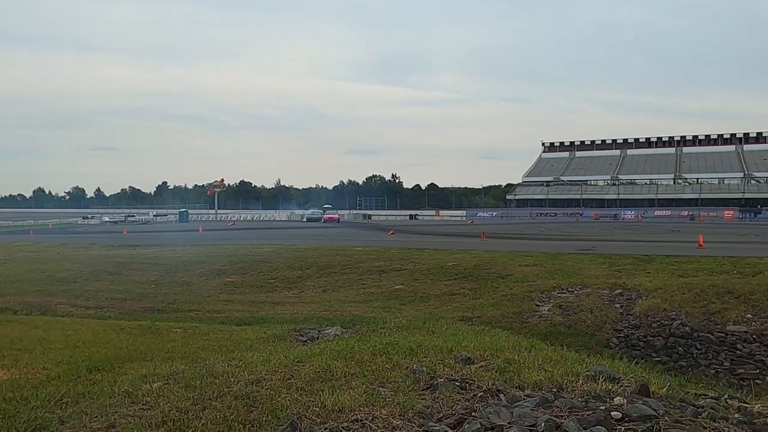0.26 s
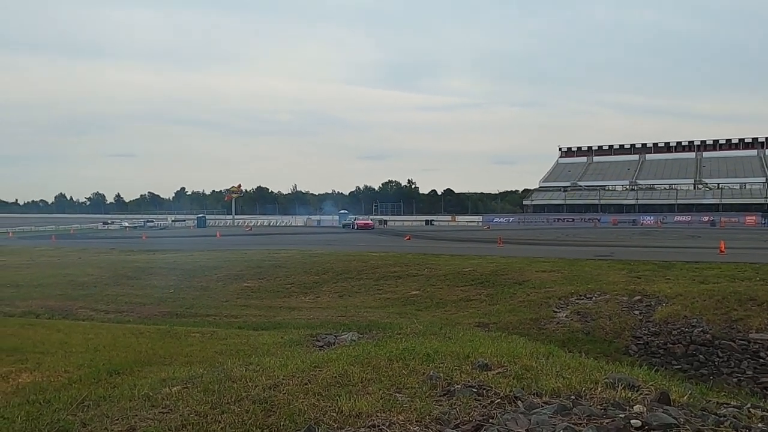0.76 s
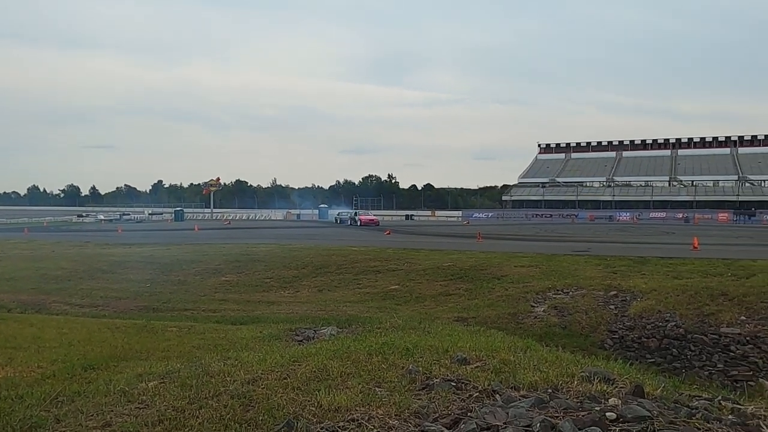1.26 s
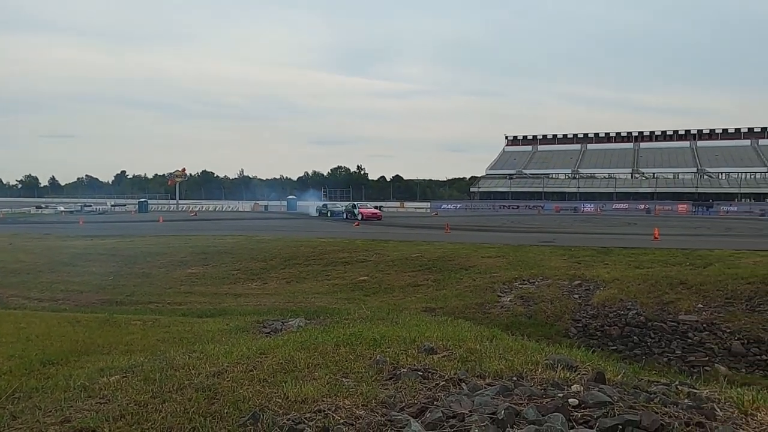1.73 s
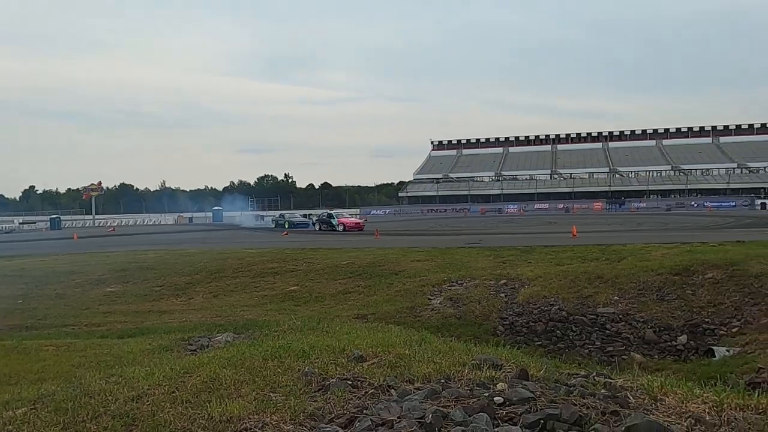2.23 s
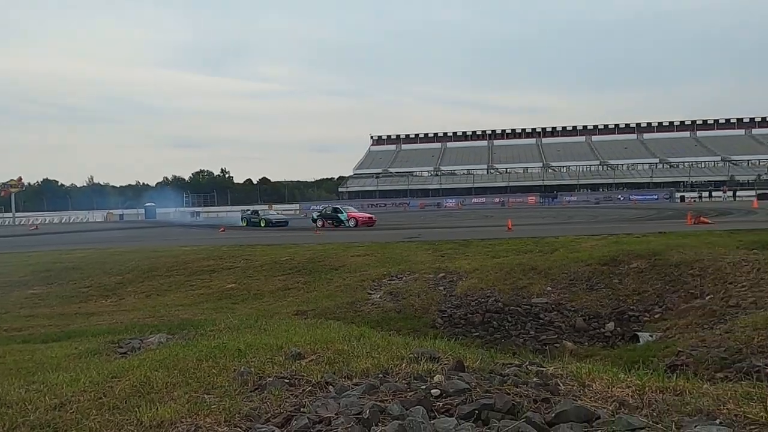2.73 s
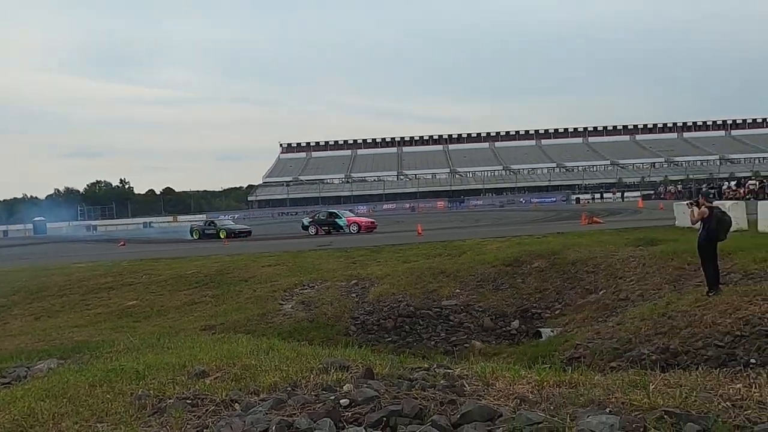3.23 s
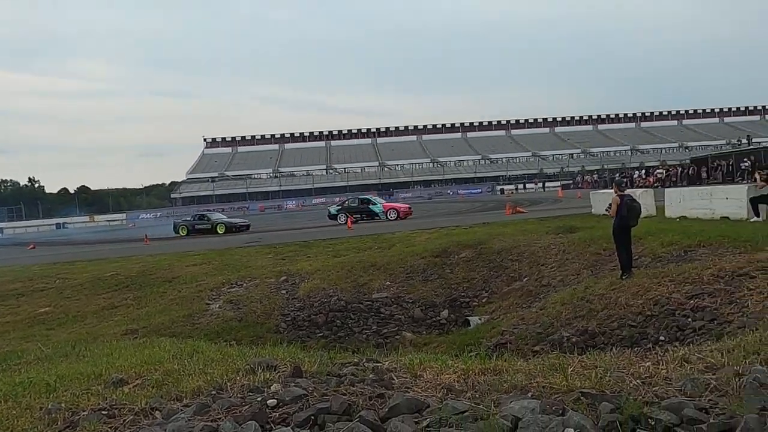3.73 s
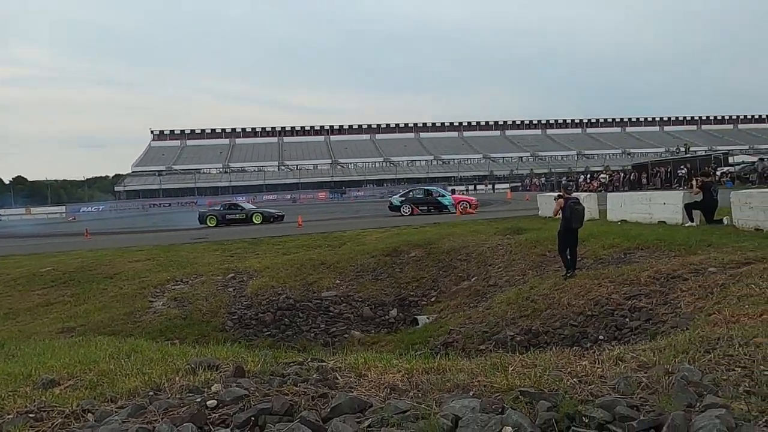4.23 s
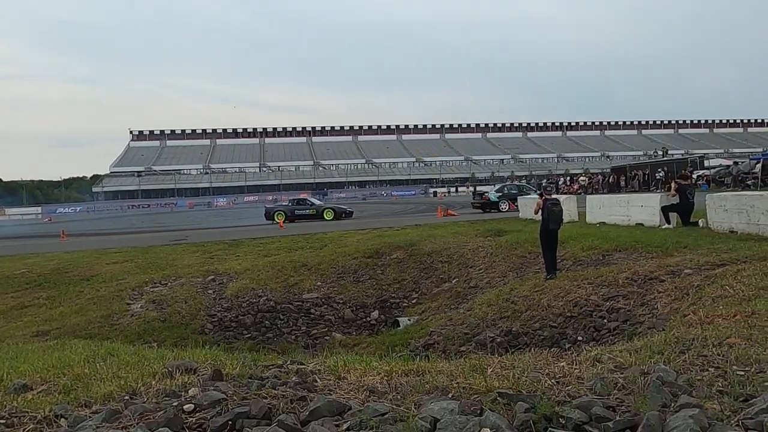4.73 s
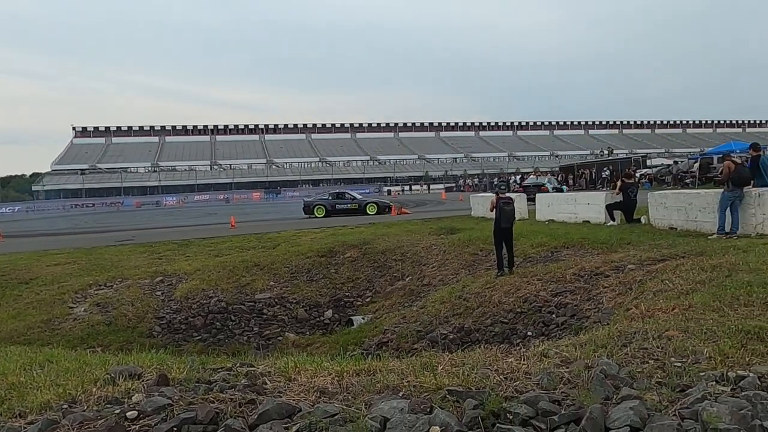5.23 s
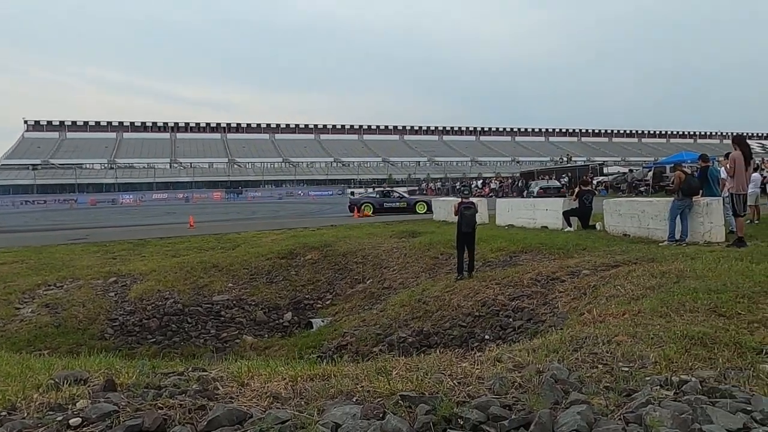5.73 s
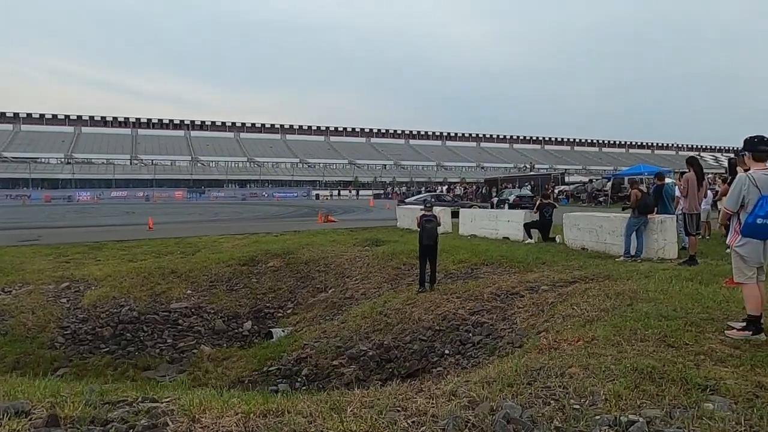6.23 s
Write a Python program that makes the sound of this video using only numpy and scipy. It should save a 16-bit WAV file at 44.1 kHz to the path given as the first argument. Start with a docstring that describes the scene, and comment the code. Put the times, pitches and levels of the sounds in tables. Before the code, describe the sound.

A mono trackside microphone at an open raceway. From 0 s, two uneven-firing V8 drift cars roar in short throttle bursts while tyres howl at several wavering pitches over a rough groan and rasp of scrubbed rubber. Throttle stabs continue until about 1.2 s; the slide dulls from 1.4 s and has almost gone by 2.1 s. From 2.1 to 4.2 s the cars coast: deep burbling overrun with sinking pitch, steady rolling noise, a thin falling whine, faint dry ticks close by, and a light scuff near 3.5 s. One engine picks up around 3.9 s. At 4.3 s a nearer tyre bites with a loud, clear squeal near 900 Hz, joined by others. From 5.2 s this breaks into ragged, chirping, tearing screech. Engines sink low, thud at 5.6 s, then rev until about 6.4 s as tearing fades. An insect trills very faintly throughout; squeals scatter in a short echo.

```python
"""Tyres howl and two V8 drift cars roar on the throttle, sliding through a corner of an open raceway.
They coast on a burbling overrun, then slide again, nearer, with several tyres screeching, and rev up.
Engines are sums of sine waves on the crank's turning; squeals are wavering tones with overtones;
scrubbed rubber, rumble and rolling are shaped noise. Barriers and a grandstand scatter the squeals.
An insect trills faintly in the grass, and tiny dry ticks sound close by."""
import sys
import numpy as np
from scipy import signal
from scipy.fft import rfft, irfft, next_fast_len
from scipy.io import wavfile
from scipy.ndimage import uniform_filter1d, map_coordinates

SR = 44100
rng = np.random.default_rng(int(sys.argv[2]) if len(sys.argv) > 2 else 0)


def transcribe(signal):
    """Save signal, clipped to [-1, 1], as a 16-bit WAV file at the path in sys.argv[1]."""
    frames = np.atleast_2d(signal).T
    limited = np.clip(frames, -1, 1)
    pcm = np.round(limited * 32767).astype(np.int16)
    wavfile.write(sys.argv[1], SR, pcm)


N = 285338  # length in samples


def amp(db):
    """Turn decibels into a gain."""
    return 10 ** (np.asarray(db) / 20)


def unit(x):
    """Scale x to an rms level of 1."""
    return x / np.sqrt(np.mean(x ** 2) + 1e-20)


def along(points, hz):
    """Read (pitch_hz, value) points at any frequency, on a log scale."""
    point_hz, value = np.transpose(points)
    return np.interp(np.log(hz + 1), np.log(point_hz + 1), value)


def curves(rows):
    """Draw each column after the time as a curve with one value per sample."""
    time_s, *columns = np.transpose(rows)
    return [np.interp(np.arange(N) / SR, time_s, column) for column in columns]


def held(t, start, end, attack, release):
    """Stay at 1 from start to end, with a straight rise before and a straight fall after."""
    return np.clip(1 + np.minimum((t - start) / attack, (end - t) / release), 0, 1)


def during(rows, fade=.03):
    """Stay at 1 over the time of a table and fade to 0 outside it."""
    return held(np.arange(N) / SR, rows[0][0], rows[-1][0], fade, fade)


def wobble(rate, size=N):
    """Draw a smooth random curve through `rate` random points a second."""
    points = rng.standard_normal(int(size * rate / SR) + 4)
    return map_coordinates(points, [np.arange(size) * rate / SR])


def turns(hz):
    """Add up a changing frequency into a running phase, from a random start."""
    return 2 * np.pi * (np.cumsum(hz) / SR + rng.random())


def filtered(x, response):
    """Multiply the spectrum of x by a response to frequency."""
    size = next_fast_len(N + SR // 2)
    spectrum = rfft(x, size) * response(np.fft.rfftfreq(size, 1 / SR))
    return irfft(spectrum, size)[:N]


def rush(spectrum, patchy_db):
    """Make coloured noise of rms 1 whose short, narrow patches get random gains."""
    grid = signal.stft(rng.standard_normal(N), nperseg=1024)[2]
    patches = uniform_filter1d(rng.standard_normal(grid.shape), size=3, axis=0)  # across pitch
    patches = uniform_filter1d(patches, size=6, axis=1)  # across time
    patchy = signal.istft(grid * amp(patchy_db * unit(patches)), nperseg=1024)[1][:N]
    return unit(filtered(patchy, lambda hz: amp(along(spectrum, hz))))


# How long the raceway's echo takes to fall by 60 dB: pitch_hz, fall_time_s
ECHO_TIMES = [(150, 0.3), (1000, 0.54), (4000, 0.63), (10000, .15)]


def raceway(x, wet_db):
    """Add the scatter from barriers and stands, a dying noise tail, at about the same total power."""
    hz, t, grid = signal.stft(rng.standard_normal(SR // 2), SR, nperseg=256)
    dying = amp(-60 * t / along(ECHO_TIMES, hz)[:, None])
    tail = signal.istft(grid * dying, SR, nperseg=256)[1]
    echo = signal.fftconvolve(x, tail)[:N]
    return (x + amp(wet_db) * np.std(x) * unit(echo)) / np.hypot(1, amp(wet_db))


def insect(chirp_hz=18, pitch_hz=7600, arch_hz=450, db=-64):
    """Each wing stroke is a short chirp that arches up in pitch as it gets louder."""
    stroke = np.clip(np.sin(turns(chirp_hz * (1 + .08 * wobble(6.5)))), 0, 1)
    wing_hz = pitch_hz + arch_hz * stroke + 90 * wobble(900)
    return amp(db + 2 * wobble(10)) * stroke * np.sin(turns(wing_hz))


# Faint close ticks, levels relative to each other: start_s, level_db
TICK_TIMES = [(2.1936, -52.5), (2.2818, -44.5), (2.3284, -51), (2.3498, -46), (2.695, -45), (2.7643, -47.5),
              (3.025, -43.5), (3.0955, -50.5), (3.1078, -46.5), (3.4464, -52.5), (3.521, -43), (3.591, -46),
              (3.6005, -47.5)]


def ticks(t60=.014, rustle_db=-17, rustle_t60=.16):
    """Tiny dry ticks of bright noise die at once, each over a softer, longer rustle (t60 in seconds)."""
    t = np.arange(N) / SR
    envelope = np.zeros(N)
    for start_s, level_db in TICK_TIMES:
        age = t - start_s
        snap = amp(-60 * np.abs(age) / t60)
        rustle = amp(rustle_db - 60 * np.abs(age) / rustle_t60)
        envelope += amp(level_db) * (age >= 0) * (snap + rustle)
    tick_colour = [(2500, -42), (5500, -1.5), (8400, -3.0), (9500, -14.0), (14000, -13.5)]  # Hz, dB
    return amp(-3.0) * envelope * rush(tick_colour, patchy_db=-1.0)


# Loudness of the rolling noise: time_s, level_db
ROLL_LEVEL = [(0, -43), (2.3, -41.5), (3.5, -40.5), (6.47, -42)]
# Colour of the rolling noise: pitch_hz, level_db (per Hz)
ROLL_COLOUR = [(200, -11), (500, 3.5), (700, -2.5), (1000, -0.5), (1600, -3.5), (2300, -4), (3000, -9),
               (4500, -11), (5200, -24), (6200, -24), (7200, -28.5), (8600, -37), (9700, -36),
               (12000, -54.5), (14000, -69.5)]
# The coasting tyres scuff lightly: start_s, end_s, level_db
LIGHT_SCUFF = (3.44, 3.8, -51)
# Thin drivetrain whine, level before a 3 dB cut: time_s, pitch_hz, level_db
WHINE = [(2.45, 2350, -55), (2.8, 2286, -44), (3.3, 2170, -49), (3.8, 1890, -55)]


def rolling():
    """Rolling noise, a light scuff between slides and a drivetrain whine that sinks as the cars slow."""
    roll_db, = curves(ROLL_LEVEL)
    roll = amp(roll_db + 0.31 * wobble(3)) * rush(ROLL_COLOUR, patchy_db=2.5)

    start, end, scuff_db = LIGHT_SCUFF
    scuff_colour = [(1200, -25), (3000, 1), (4200, -5), (6500, -34), (10000, -70)]  # Hz, dB
    scuff_shape = held(np.arange(N) / SR, start, end, attack=0.22, release=0.35)
    scuff = amp(scuff_db) * scuff_shape * rush(scuff_colour, patchy_db=1.5)

    whine_hz, whine_db = curves(WHINE)
    whine = np.sin(turns(whine_hz * (1 + .002 * wobble(60))))
    whine *= amp(whine_db - 3 + 2 * wobble(14)) * during(WHINE, fade=.2)
    return roll + scuff + whine


THROTTLE_RISE_S, THROTTLE_FALL_S = 0.093, 0.18
# How the tailpipe boosts or softens each pitch: pitch_hz, gain_db
TAILPIPE = [(75, -12), (100, -5), (122, -4.5), (137, 2.5), (150, 0.5), (170, -6.5), (200, -4), (280, -10),
            (400, -11.5), (550, -9)]


def engine(speed, orders, throttle, jitter, rough_db, upper_db):
    """A cross-plane V8 fires unevenly, so low orders are strong; they sweep the tailpipe and blare."""
    t = np.arange(N) / SR
    cycle_hz, = curves(speed)
    crank = turns(cycle_hz * (1 + jitter * wobble(25)))
    strong = (4, 5, 6, 8, 12)  # orders: waves in one four-stroke cycle

    pedals = np.array([held(t, opens, closes, THROTTLE_RISE_S, THROTTLE_FALL_S)
                       for opens, closes, *_ in throttle])
    load = pedals.sum(axis=0)
    coasting_db = np.array([db + along(TAILPIPE, k * cycle_hz) for k, db in zip(strong, orders)])
    blare_db = np.array(throttle)[:, 2:].T @ pedals
    # slide between the coasting and blaring levels; overlapping bursts are averaged
    levels = (np.clip(1 - load, 0, 1) * coasting_db + blare_db) / np.maximum(load, 1)

    def order(k, db):
        roughness = unit(amp(rough_db * wobble(28)))
        return np.sqrt(2) * amp(db) * roughness * np.sin(k * crank + 2 * np.pi * rng.random())

    # the orders in between rise and fall with the twelfth
    between = sum(order(k, levels[-1] + upper_db) for k in (7, 9, 10, 11, 13, 14, 16))
    return sum(order(k, db) for k, db in zip(strong, levels)) + between


# Engine speed of each car: time_s, cycles_hz (four-stroke cycles a second)
LEAD_CYCLES = [(0, 41.5), (.3, 40.7), (.55, 37.7), (.72, 34.8), (.85, 33.8), (1.05, 36.5), (1.2, 37.2),
               (1.4, 33.5), (1.9, 33.5), (2.4, 38.9), (3.55, 32), (3.95, 27.7), (4.6, 23.1), (5.55, 19),
               (5.67, 23), (5.9, 27.2), (6.2, 29.7), (6.47, 27.7)]
CHASE_CYCLES = [(0, 46.4), (.15, 46), (.45, 44), (.75, 46), (.92, 45.7), (1.33, 35.7), (1.5, 36), (1.7, 38),
                (2, 36.5), (2.8, 32.9), (3.6, 30.4), (3.85, 33.3), (4.25, 32.2), (4.45, 28.2), (5.2, 23.4),
                (5.6, 21.5)]
# Note off the throttle, before the tailpipe: level_db of orders 4, 5, 6, 8 and 12
LEAD_COASTING = [-37.5, -27, -33.5, -33, -41.5]
CHASE_COASTING = [-26, -37.5, -29, -34.5, -44.5]
# Bursts of throttle, each with its blare: opens_s, closes_s, level_db of orders 4, 5, 6, 8 and 12
LEAD_BURSTS = [(0, 0.254, -49, -32, -30.5, -36, -38), (.42, 0.557, -49, -35, -23.5, -27.5, -42),
               (.7, .84, -45, -20, -29.5, -26, -47), (.97, 1.17, -34.5, -20, -23, -19, -48),
               (5.66, 5.78, -23, -28, -29.5, -32, -46), (5.92, 6.367, -27, -20.5, -37, -41.5, -42)]
CHASE_BURSTS = [(0, 0.244, -26, -29, -56, -22.5, -37.5), (0.425, .62, -38, -24, -44, -35, -50),
                (0.764, 0.925, -28, -27, -28, -34, -35), (1.053, 1.23, -36, -27, -41, -36, -34.5),
                (3.866, 4.283, -30, -34.5, -34.5, -34.5, -45.5)]
# Loudness of irregular combustion: time_s, thud_db, burble_db, bark_db
COMBUSTION = [(0, -52, -32, -29.5), (.55, -51.5, -33.5, -36.5), (1.05, -38, -27.5, -37),
              (1.3, -40, -24, -33), (1.5, -37.5, -25, -37.5), (2.1, -35.5, -29.5, -39),
              (2.8, -38.5, -26.5, -40), (3.7, -34.5, -28.5, -42), (4.3, -37, -28, -44),
              (4.6, -41.5, -28, -50.5), (5.35, -37, -34.5, -43.5), (5.6, -20.5, -29, -41.5),
              (5.85, -34, -26.5, -40.5), (6.1, -49.5, -28, -38), (6.47, -37, -28.5, -43.5)]
# Colours of its low thud, middle burble and higher bark: pitch_hz, level_db (per Hz)
THUD_COLOUR = [(20, -35), (45, -19), (65, -13.5), (88, 2.5), (105, 3), (135, -29), (250, -87.5)]
BURBLE_COLOUR = [(70, -41), (105, -2), (145, 3.5), (215, -0.5), (280, -7.5), (340, -23.5), (600, -71)]
BARK_COLOUR = [(230, -39.5), (335, 0), (400, -0.5), (520, -1), (700, -12), (1200, -72)]


def exhausts():
    """Both engines' notes sound over three bands of noise from irregular combustion."""
    settings = dict(jitter=.005, rough_db=1.8, upper_db=-6)
    lead = engine(LEAD_CYCLES, LEAD_COASTING, LEAD_BURSTS, **settings)
    chase = engine(CHASE_CYCLES, CHASE_COASTING, CHASE_BURSTS, **settings)
    thud_db, burble_db, bark_db = curves(COMBUSTION)
    thud = amp(thud_db) * rush(THUD_COLOUR, patchy_db=-1.0)
    burble = amp(burble_db) * rush(BURBLE_COLOUR, patchy_db=2.0)
    bark = amp(bark_db) * rush(BARK_COLOUR, patchy_db=2.0)
    return lead + chase + thud + burble + bark


# Rubber tearing over asphalt in the first slide: time_s, groan_db, rasp_db, hiss_db
FAR_TEARING = [(0, -20, -26, -50.5), (.22, -24, -24.5, -44), (.35, -22.5, -24.5, -52),
               (.7, -22, -26.5, -53), (1, -23.5, -35.5, -62), (1.2, -23.5, -36.5, -59),
               (1.45, -30.5, -47, -79.5), (1.9, -28.5, -50, -81), (2.06, -52, -62, -80),
               (2.2, -41.5, -58, -73)]
# Colours of its low groan and higher rasp: pitch_hz, level_db (per Hz)
FAR_GROAN_COLOUR = [(240, -31), (400, -20), (429, -9.5), (502, -0.5), (611, 3.5), (740, -1.5), (812, -12.5),
                    (885, -2.5), (1030, -1), (1140, -2.5), (1280, -9), (1450, -16.5), (1600, -12),
                    (2080, -39.5), (3520, -120)]
FAR_RASP_COLOUR = [(820, -26), (1400, 0), (1500, -6.5), (1700, -6), (2200, 0), (2430, -2.5), (2750, -11),
                   (3470, -10.5), (4310, -21), (4670, -23.5), (6070, -50.5), (10300, -120)]
# Colour of the tyre hiss, used in both slides: pitch_hz, level_db (per Hz)
HISS_COLOUR = [(3500, -21.5), (5000, -0.5), (6000, -4.5), (7000, -10), (8200, -21.5), (9500, -21),
               (11000, -29.5), (12500, -41.5), (14000, -59)]


def far_tyres():
    """Tyres spinning in the first corner: a roar of scrubbed rubber that dulls as the slide eases."""
    groan_db, rasp_db, hiss_db = curves(FAR_TEARING)
    groan = amp(groan_db) * rush(FAR_GROAN_COLOUR, patchy_db=2.0)
    rasp = amp(rasp_db) * rush(FAR_RASP_COLOUR, patchy_db=1.5)
    hiss = amp(hiss_db) * rush(HISS_COLOUR, patchy_db=3.5)
    return (groan + rasp + hiss) * during(FAR_TEARING, fade=0.066)


def squeal(pitch_hz, levels, waver_hz, rasp_hz, flutter_db, fall_db, count=5):
    """Tread sticks and slips at a wavering pitch; overtones past the given levels fall away evenly."""
    size = len(pitch_hz)
    wavering_hz = pitch_hz + waver_hz * wobble(70, size) + rasp_hz * wobble(450, size)
    phase = turns(wavering_hz)
    levels = levels + [levels[-1] - fall_db * k for k in range(1, count + 1 - len(levels))]
    tone = sum(amp(db + 1.6 * wobble(60, size)) * np.sin(k * phase) for k, db in enumerate(levels, 1))
    return np.sqrt(2) * tone * unit(amp(flutter_db * wobble(90, size)))


# longer squeals swell and die more slowly, by the LINGER share of their length
SQUEAL_ATTACK_S, SQUEAL_RELEASE_S, LINGER = .03, .04, .14
# Tread patches that catch and squeal, levels before the final mix:
# start_s, end_s, first_pitch_hz, last_pitch_hz, level_db,
# second_harmonic_db, third_harmonic_db (both relative to the level)
PATCH_SQUEALS = [(0.018, .3, 700.5, 729, -28, -11.5, -26), (.02, 0.498, 1160, 1180, -23.5, -16, -24.5),
                 (.02, 0.553, 1251, 1285, -25, -15.5, -29.5), (.02, 1.195, 953, 952, -37.5, -8.5, -20),
                 (0.399, 0.807, 693.6, 603, -31.5, 4, -10.5), (0.519, 0.943, 1129, 1120, -30, -7.5, -22),
                 (0.568, 0.886, 1256, 1259, -34, -4, -24.5), (.86, 1.253, 547.2, 631, -28.5, -11.5, -28.5),
                 (0.999, 1.444, 1213, 1234, -45.5, 0.5, -19), (1.052, 1.379, 1109, 1157, -38.5, -0.5, -17),
                 (1.47, 1.552, 1143, 1136, -34.5, -21.5, -33), (1.302, 1.577, 600, 599, -32.5, -13, -21.5),
                 (1.34, 1.604, 883.5, 893, -29.5, -18.5, -33),
                 (1.69, 2.02, 617.5, 648.3, -25.5, -18, -31.5), (1.679, 1.714, 896, 892, -25, -19, -36),
                 (1.795, 2.033, 893, 909, -40, -10.5, -25), (2.148, 2.401, 642, 636, -45.5, -16, -31),
                 (4.381, 4.521, 1049, 1004, -27, -5.5, -17), (4.38, 4.601, 1263, 1220, -33, -11.5, -22.5),
                 (4.569, 4.69, 1027, 1025, -22.5, -8, -22), (4.77, 4.91, 1083, 1055, -23.5, -4, -7),
                 (4.76, 5.141, 1181, 1126, -28, -5, -14), (4.95, 5.02, 1042, 1061, -27.5, -2, 2),
                 (5.048, 5.3, 1085, 978.3, -22.5, -6, -20), (5.24, 5.396, 1119, 1078, -25, -15, -19),
                 (5.25, 5.311, 759, 720, -26, -8.5, -11.5), (5.345, 5.453, 745, 773, -29.5, 0.5, -9.5),
                 (5.421, 5.468, 1066, 1062, -20, -8, -21.5), (5.482, 5.71, 718.4, 699, -27, 3, -2.5),
                 (5.531, 5.744, 1066, 1032, -40.5, 0.5, -8.5), (5.762, 5.854, 738, 741, -27.5, -1, -11),
                 (5.878, 6.45, 740, 819, -31.5, -12.5, -19), (5.89, 6.104, 973, 1008, -24, -8, -14),
                 (5.972, 6.3, 1117, 1064, -28, -11, -22), (6.144, 6.423, 990, 1002, -26, -9.5, -26),
                 (6.309, 6.472, 640.6, 635, -27.5, -1.5, -12.5)]
# How near the cars are: time_s, nearness (0 far to 1 near, no unit)
NEARNESS = [(2.7, 0.029), (4.3, 1)]


def tread_patches():
    """Each patch catches, glides in pitch and lets go; tread out of step around it smears the note."""
    notes, smear = np.zeros(N), np.zeros(N)
    for start, end, first_hz, last_hz, db, second_db, third_db in PATCH_SQUEALS:
        attack = min(SQUEAL_ATTACK_S + LINGER * (end - start), start)
        release = SQUEAL_RELEASE_S + LINGER * (end - start)
        at = np.arange(max(0, int((start - attack) * SR)), min(N, int((end + release) * SR)))
        pitch_hz = np.interp(at / SR, [start, end], [first_hz, last_hz])
        grip = amp(db) * held(at / SR, start, end, attack, release)
        levels = [0, second_db, third_db]
        notes[at] += grip * squeal(pitch_hz, levels, waver_hz=9.08, rasp_hz=17.04,
                                   flutter_db=2, fall_db=8.5)
        smear[at] += grip * squeal(pitch_hz, levels, waver_hz=28.1, rasp_hz=69.5,
                                   flutter_db=1.8, fall_db=6)
    near, = curves(NEARNESS)
    # far squeals carry more echo than near ones
    far_notes = amp(-.5) * raceway((1 - near) * notes, wet_db=-1.5)
    near_notes = amp(-0.16) * raceway(near * notes, wet_db=-7.5)
    return far_notes + near_notes + amp(-10.0) * raceway(smear, wet_db=2)


def chatter(spectrum, low_hz, high_hz, glide, rasp, burst_db, count=18):
    """Tread blocks of many sizes each chirp in short gliding bursts, together at rms 1."""
    blocks = np.zeros(N)
    for hz in np.geomspace(low_hz, high_hz, count):
        burst = amp(burst_db * np.tanh(wobble(34) - .5))
        pitch_hz = hz * (1 + glide * wobble(14) + rasp * wobble(350))
        blocks += burst * np.sin(turns(pitch_hz))
    # the blocks are spaced wider at high pitch, so the square root evens out their power per Hz
    return unit(filtered(blocks, lambda hz: amp(along(spectrum, hz)) * np.sqrt(hz)))


# The tyre that leads the second slide: time_s, pitch_hz, level_db, second_harmonic_db (relative)
LEADING_SQUEAL = [(4.295, 914, -24.5, -18.5), (4.335, 909.6, -18.5, -17.5), (4.41, 972, -17, -30),
                  (4.52, 931.7, -16, -10.5), (4.61, 977, -18, -1.5), (4.69, 921, -17, -7.5),
                  (4.95, 918.4, -21.5, -4.5), (5.08, 878.2, -25, -3.5), (5.42, 851, -26, -7.5),
                  (5.8, 892, -29.5, -7.5), (6.47, 906, -34, -7.5)]
# Rubber tearing over asphalt in the second slide: time_s, groan_db, rasp_db, hiss_db
NEAR_TEARING = [(4.25, -60, -50, -63), (4.38, -47, -31, -57), (4.62, -48, -30.5, -49),
                (4.85, -32.5, -29, -45.5), (5.1, -32, -28.5, -38), (5.16, -25.5, -30.5, -50),
                (5.28, -25.5, -30.5, -45.5), (5.34, -18.5, -22.5, -41), (5.43, -21.5, -23.5, -41),
                (5.56, -22.5, -27.5, -48.5), (5.68, -19, -23, -46), (5.88, -19, -33, -56),
                (6.3, -26, -35, -68), (6.47, -35.5, -39, -71)]
# Colours of its low groan and higher rasp: pitch_hz, level_db (per Hz)
NEAR_GROAN_COLOUR = [(320, -53.5), (550, -19), (640, -10.5), (704, -11), (804, -6), (862, -1.5),
                     (1020, -5.5), (1250, -11), (1400, -3.5), (1510, -8), (1730, -3), (2330, -27.5),
                     (2500, -5), (3250, -34.5), (5500, -120)]
NEAR_RASP_COLOUR = [(1180, -27), (2000, 0), (2460, -3), (2670, -2), (2890, -5.5), (3240, -4.5),
                    (3870, -10.5), (4330, -15), (4670, -15.5), (6070, -39.5), (10300, -120)]


def near_tyres():
    """The second slide: one tyre bites with a clear note, then the screech breaks up into tearing."""
    pitch_hz, db, second_db = curves(LEADING_SQUEAL)
    levels = [db, db + second_db, db + second_db - 15]
    bite = during(LEADING_SQUEAL, fade=0.013)
    screech = bite * squeal(pitch_hz, levels, waver_hz=7, rasp_hz=15, flutter_db=2.2, fall_db=6)
    # the rest of the tread slips out of step, smearing the leading note into a band
    smear = bite * squeal(pitch_hz, levels, waver_hz=28, rasp_hz=65, flutter_db=1.5, fall_db=4)
    smear *= amp(-12)

    groan_db, rasp_db, hiss_db = curves(NEAR_TEARING)
    # the harder the rubber groans, the more of its noise turns into chirps
    share = .75 * np.sqrt(amp(groan_db - groan_db.max()))

    def tearing(spectrum, chirps):
        return np.sqrt(1 - share) * rush(spectrum, patchy_db=3.0) + np.sqrt(share) * chirps

    groan_chirps = chatter(NEAR_GROAN_COLOUR, low_hz=900, high_hz=2200, glide=.035, rasp=.016,
                           burst_db=9, count=16)
    rasp_chirps = chatter(NEAR_RASP_COLOUR, low_hz=2000, high_hz=4200, glide=.025, rasp=.012,
                          burst_db=9, count=14)
    scrub = amp(groan_db) * tearing(NEAR_GROAN_COLOUR, groan_chirps)
    scrub += amp(rasp_db) * tearing(NEAR_RASP_COLOUR, rasp_chirps)
    scrub += amp(hiss_db) * rush(HISS_COLOUR, patchy_db=3)
    scrub *= during(NEAR_TEARING) * amp(1 * wobble(60))
    return raceway(screech, wet_db=-9) + raceway(smear, wet_db=3) + scrub


def scene():
    """Grass, track and cars are added together, heard from one spot."""
    background = insect() + ticks() + rolling()
    tyres = far_tyres() + tread_patches() + near_tyres()
    return (background + exhausts() + tyres)[None]


TOP_HZ = 14100  # nothing sounds at or above this pitch


def record(dry):
    """The microphone's one channel keeps only what lies below its band limit."""
    return filtered(dry[0], lambda hz: hz < TOP_HZ)[None]


dry = scene()
out = record(dry)
transcribe(out)
```